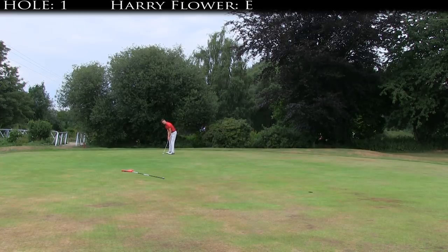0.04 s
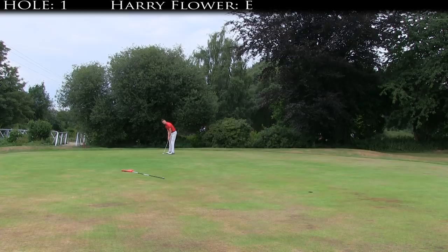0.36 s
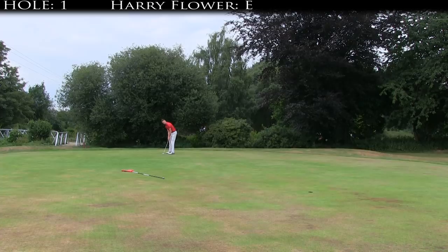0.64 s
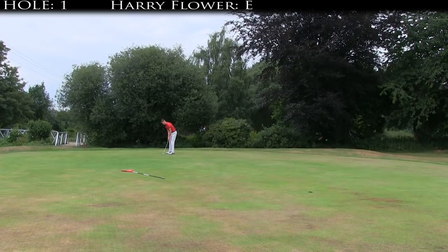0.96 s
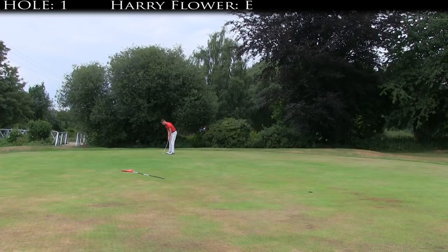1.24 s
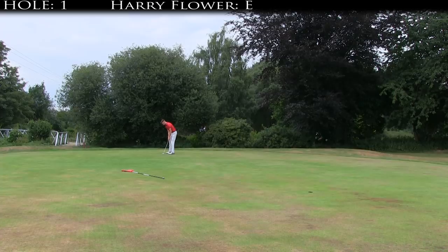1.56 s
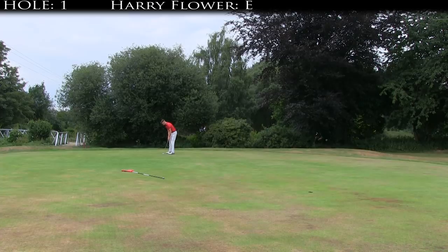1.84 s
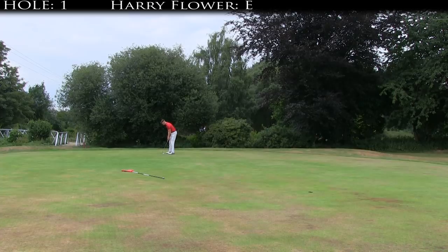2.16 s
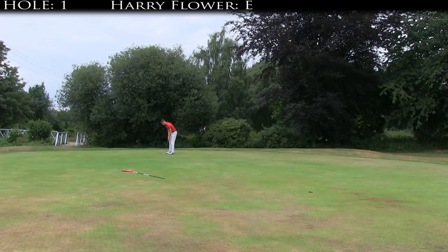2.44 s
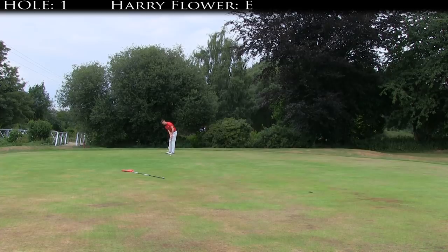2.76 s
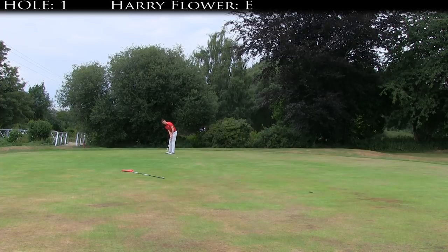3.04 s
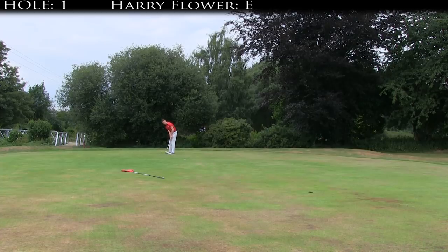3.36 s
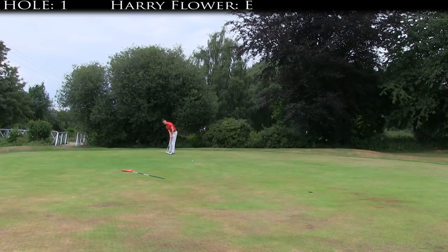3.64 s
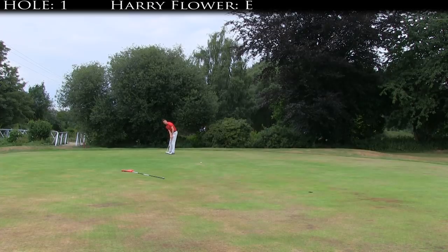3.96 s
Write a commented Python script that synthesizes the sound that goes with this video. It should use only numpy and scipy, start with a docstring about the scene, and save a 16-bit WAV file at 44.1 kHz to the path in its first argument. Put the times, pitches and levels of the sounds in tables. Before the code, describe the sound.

A putter clicks against a golf ball over faint birds, wind and distant traffic.

```python
"""A putt on a golf green

A putter strikes a golf ball: both ring for an instant, making one dry click. A low thud comes with it.
The ball sets off over the grass with a faint rustle, and a few tiny ticks dot the scene.
Small birds whistle in the trees. Behind them lie far traffic, an engine drone and light wind."""
import sys
import numpy as np
from scipy import signal
from scipy.fft import rfft, irfft
from scipy.io import wavfile

SR = 44100
rng = np.random.default_rng(int(sys.argv[2]) if len(sys.argv) > 2 else 0)


def digitize_waveform(pressure):
    """Quantize a signal to 16-bit integers and store it at the path in sys.argv[1].

    Rows of a 2-D input are taken as channels; values are limited to [-1, 1].
    """
    field = np.atleast_2d(pressure).T
    bounded = np.clip(field, -1, 1)
    quanta = np.round(bounded * 32767).astype(np.int16)
    wavfile.write(sys.argv[1], SR, quanta)


N = 176400  # 4 seconds
PUTT_S = 2.60784  # when the putter meets the ball

# A fade time is how long a sound takes to drop by 60 dB.
# ringing tones of putter and ball (pitch [Hz], relative level [dB], fade time [s])
CLICK_TONES = [(170, -25, 0.037), (500, -18, 0.037), (600, -25, .037), (870, -9.5, 0.018),
               (1106, -13, .034), (1251, -11, .018), (1564, -5.5, 0.016), (1890, -10, 0.012),
               (2040, -7.5, 0.019), (3230, -8.5, 0.013), (4029, -16, .0055), (4700, -12, 0.0053),
               (5470, -5.5, 0.0076), (6180, -12, .0045), (7330, -11, 0.0039), (9700, -14, 0.012),
               (11250, -13.5, 0.0047), (12640, -21, .0066), (13500, -22.8, .006), (14640, -20.7, .003)]
# deep tones that die away after the click (pitch [Hz], level [dB], fade time [s])
THUMP_TONES = [(24, -26.5, .25), (62.4, -27, 0.24), (125, -36, 0.11)]
# the ball brushing the grass (start [s], fade time [s], level [dB])
GRASS_BRUSHES = [(2.645, 0.39, -40.5), (2.708, 0.088, -41.5), (2.762, 0.65, -48)]
# tone colour of the rustle (frequency [Hz], relative level [dB])
GRASS_COLOUR = [(200, 7), (500, 7), (1500, -1), (3000, 0.5), (4000, -7), (5300, 2), (7500, 0.5),
                (10500, -7), (15500, -14)]
# tiny ticks (start [s], level [dB], pitch [Hz], fade time [s])
TINY_TICKS = [(.422, -48, 4900, .04), (1.111, -45, 4500, .015), (2.673, -36, 530, 0.036),
              (2.767, -43, 2980, .02), (2.771, -41, 493, 0.051), (2.879, -31.5, 10800, 0.005)]
# bird whistles (start [s], length [s], first pitch [Hz], last pitch [Hz], level [dB],
# loudest point [share of the length])
BIRD_NOTES = [(.085, .05, 6730, 6700, -47.5, .4), (.2, 0.13, 6930, 7200, -52.5, 0.73),
              (.525, .045, 6760, 6580, -47, 0.43), (.645, 0.14, 6970, 7130, -49, 1),
              (.972, .025, 6700, 6270, -53, .5), (.995, .04, 6300, 6400, -54, .4),
              (1.09, .16, 6880, 7030, -49.5, .65), (1.3, 0.16, 7200, 7430, -53.5, 0.54),
              (1.155, .06, 4450, 3800, -52.5, .65), (1.275, .068, 3720, 3400, -54, .45),
              (1.417, 0.043, 3800, 3420, -52, 0.46), (.22, 0.12, 2037, 1700, -47.5, .4)]
# tone colour of the tyre roar (frequency [Hz], relative level [dB])
ROAR_COLOUR = [(110, -13), (200, -1), (380, -3), (600, -2), (800, -2), (1050, 0.5), (1400, -6), (1750, -14),
               (2200, -20), (3000, -26)]
# loudness of the tyre roar (time [s], level [dB])
ROAR_LEVEL = [(0, -40), (.85, -38), (1.4, -40), (1.85, -37), (2.3, -39.5), (3, -41), (4, -41)]
# tone colour of the roar's bright part (frequency [Hz], relative level [dB])
BRIGHT_ROAR_COLOUR = [(900, -47), (1400, 6.5), (1700, 5), (2000, -6.5), (2500, -44)]
# loudness of that bright part (time [s], level [dB])
BRIGHT_ROAR_LEVEL = [(0, -48.5), (.8, -50), (1.5, -56.5), (4, -52.5)]
# an engine's drone and whine (pitch [Hz], waver rate [Hz], level [dB])
ENGINE_TONES = [(76.15, 9.4, -40), (807.6, 16, -53)]
# tone colour of the wind's rumble (frequency [Hz], relative level [dB])
WIND_COLOUR = [(12, -12), (30, -7), (52, 2.5), (70, -9.5), (95, -7), (130, -11), (200, -15.5), (400, -27),
               (900, -50)]
# tone colour of the open air's hiss (frequency [Hz], relative level [dB])
AIR_COLOUR = [(1000, 0), (2500, 0), (4000, -1.5), (6000, -3.5), (8000, -6.5), (12000, -9.5), (15500, -13)]
# faint hiss that differs between the ears (frequency [Hz], relative level [dB])
SIDE_COLOUR = [(100, 6), (1000, -26), (5000, 0), (10000, 7.5), (15500, 3)]


def putt(t):
    """The putter's push rings the low tones; the high ones stir at first touch and crack just after."""
    out, age = np.zeros(N), t - PUTT_S
    crack_above_hz, crack_lag_s = 2600, 0.0017
    for k, (hz, db, fade) in enumerate(CLICK_TONES):
        if hz < crack_above_hz:
            tone = ring(age, hz, fade, rise_s=0.00075)
        else:
            first_touch = gain(-21) * ring(age, hz, fade, rise_s=0.0013)
            crack = ring(age - crack_lag_s, hz, fade, rise_s=0.0013)
            tone = first_touch + crack
        out += (-1) ** k * gain(db) * tone  # every other tone starts by swinging the opposite way
    return gain(0.5) * out


def thud(t):
    """A short low push and a soft, deep thump that dies away after the click."""
    age, push_s = t - PUTT_S, 0.0045
    push = gain(-23) * np.sin(np.pi * np.clip(age / push_s, 0, 1))
    thump = sum(gain(db) * ring(age, hz, fade, rise_s=push_s) for hz, db, fade in THUMP_TONES)
    return push + thump


def rustle(t):
    """The ball brushes over the grass, each grainy brush trailing off into the next."""
    brushes = sum(gain(db) * burst(t - start, fade, rise_s=0.028) for start, fade, db in GRASS_BRUSHES)
    grain = gain(1.8 * wander(rate_hz=250))
    return brushes * grain * noise(GRASS_COLOUR)


def ticks(t):
    """Tiny dry ticks, each a burst of noise around its own pitch."""
    out = np.zeros(N)
    for start, db, hz, fade in TINY_TICKS:
        band = noise([(hz / 1.12, -16), (hz, 0), (hz * 1.12, -16)])
        out += gain(db) * burst(t - start, fade, rise_s=0.00054) * band
    return out


def birds(t):
    """Small birds sing thin, gliding whistles that swell and break off."""
    song = np.zeros(N)
    waver = 1 + 0.0038 * wander(rate_hz=110)
    for start, length, first_hz, last_hz, db, peak in BIRD_NOTES:
        progress = np.clip((t - start) / length, 0, 1)
        hz = last_hz + (first_hz - last_hz) * (1 - progress) ** 1.35  # the glide slows near its end
        swell = np.sin(np.pi / 2 * np.interp(progress, [0, min(peak, 0.95), 1], [0, 1, 0]))
        song += gain(db) * swell * np.sin(2 * np.pi * np.cumsum(hz * waver) / SR)
    flutter = gain(2 * wander(rate_hz=45))
    return song * flutter


def tree_echo(t, song):
    """The trees scatter the birdsong back as a soft echo."""
    tail = rng.standard_normal(N) * burst(t, fade_s=0.65, rise_s=0.036)
    return gain(-6) * signal.fftconvolve(song, tail / np.linalg.norm(tail))[:N]


def traffic(t):
    """Far tyres make a roar that swells and dulls."""
    roar = gain_curve(t, ROAR_LEVEL) * noise(ROAR_COLOUR)
    bright = gain_curve(t, BRIGHT_ROAR_LEVEL) * noise(BRIGHT_ROAR_COLOUR)
    return (roar + bright) * gain(0.83 * wander(rate_hz=17))


def engine(t):
    """A far engine drones and whines; both tones waver in loudness and pitch."""
    out = np.zeros(N)
    for hz, rate_hz, db in ENGINE_TONES:
        angle = 2 * np.pi * hz * t
        out += gain(db) * (wander(rate_hz) * np.sin(angle) + wander(rate_hz) * np.cos(angle))
    return out


def wind():
    """Light gusts make a low, unsteady rumble under the smooth hiss of open air."""
    rumble = gain(-38 + wander(rate_hz=5.1)) * noise(WIND_COLOUR)
    hiss = gain(-52.8) * noise(AIR_COLOUR)
    return rumble + hiss


def gain(db):
    """Turns decibels into a number to multiply a sound by."""
    return 10 ** (np.asarray(db) / 20)


def gain_curve(t, points):
    """A gain that follows (time [s], level [dB]) points."""
    return gain(np.interp(t, *np.array(points).T))


def burst(age, fade_s, rise_s):
    """The loudness shape of a hit: a rounded rise, then a fade."""
    rise = np.sin(np.pi / 2 * np.clip(age / rise_s, 0, 1)) ** 2
    return rise * np.exp(-np.log(1000) * np.maximum(age - rise_s / 2, 0) / fade_s)


def ring(age, hz, fade_s, rise_s):
    """One pure tone that starts quickly and dies away."""
    return burst(age, fade_s, rise_s) * np.sin(2 * np.pi * hz * age)


def noise(colour):
    """Noise of typical size 1, shaped by (frequency [Hz], relative level [dB]) points."""
    hz, db = np.array(colour, float).T
    f = np.maximum(np.arange(N // 2 + 1) * SR / N, 1)
    shape = gain(np.interp(np.log(f), np.log(hz), db))
    edges = np.minimum(f / hz[0], 1) ** 2 * np.minimum(hz[-1] / f, 1) ** 2  # weaker past either end
    x = irfft(rfft(rng.standard_normal(N)) * edges * shape, N)
    return x / x.std()


def wander(rate_hz):
    """A smooth random drift of typical size 1; a higher rate moves faster."""
    f = np.arange(N // 2 + 1) * SR / N
    x = irfft(rfft(rng.standard_normal(N)) * np.exp(-(f / rate_hz) ** 2), N)
    return x / np.sqrt(np.mean(x ** 2))


def scene():
    """Everything sits in the centre; only a trace of hiss differs between the ears."""
    t = np.arange(N) / SR
    side = gain(-70) * noise(SIDE_COLOUR)
    foreground = putt(t) + thud(t) + rustle(t) + ticks(t)
    song = birds(t)
    centre = foreground + song + tree_echo(t, song) + traffic(t) + engine(t) + wind()
    return np.array([centre + side, centre - side])


def record(dry):
    """Rounds off the peak of the click and cuts the highest treble."""
    ceiling, top_hz = 0.82, 15800
    rounded = dry / (1 + (dry / ceiling) ** 4) ** (1 / 4)
    treble_cut = signal.ellip(10, 0.1, 90, top_hz, fs=SR, output="sos")
    return signal.sosfilt(treble_cut, rounded)


dry = scene()
out = record(dry)
digitize_waveform(out)
```